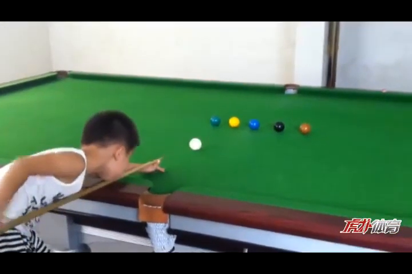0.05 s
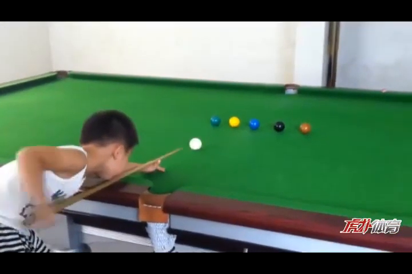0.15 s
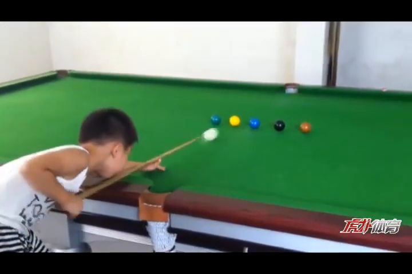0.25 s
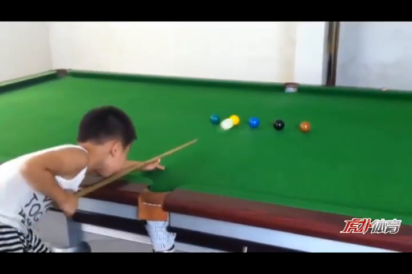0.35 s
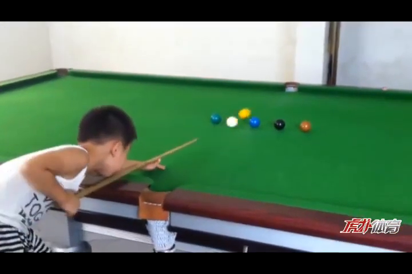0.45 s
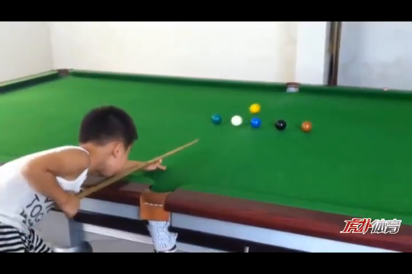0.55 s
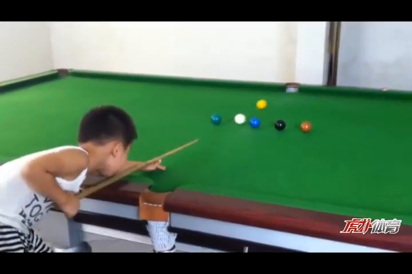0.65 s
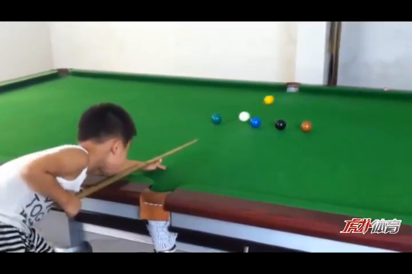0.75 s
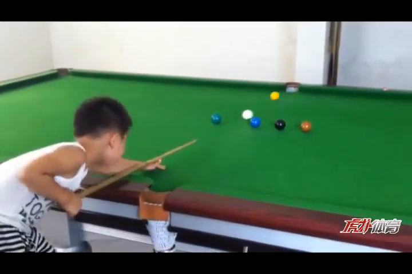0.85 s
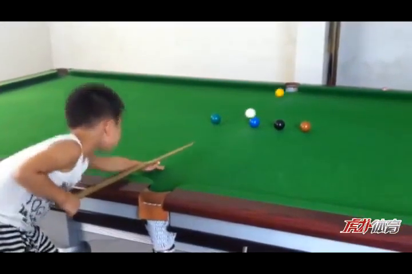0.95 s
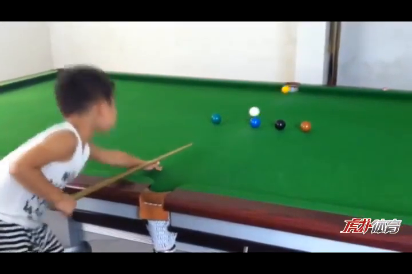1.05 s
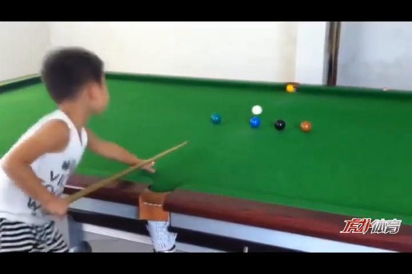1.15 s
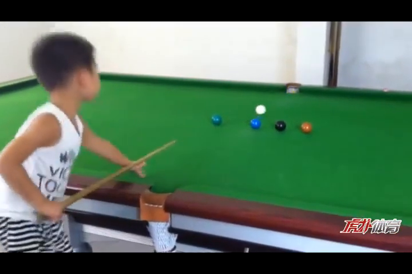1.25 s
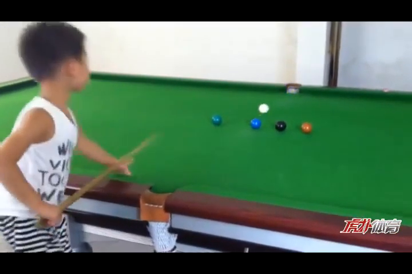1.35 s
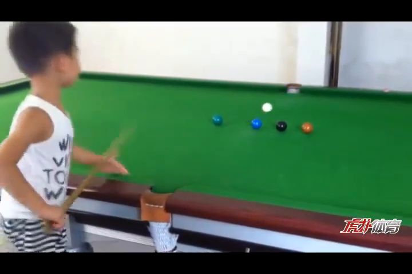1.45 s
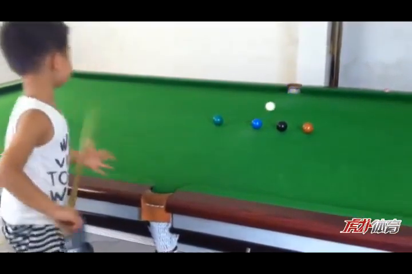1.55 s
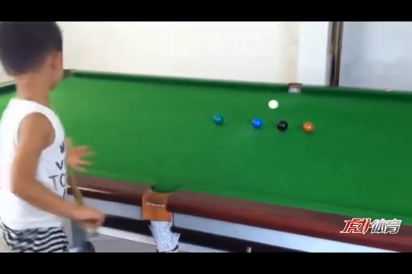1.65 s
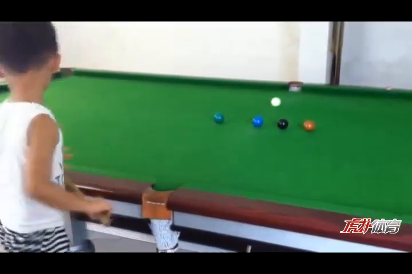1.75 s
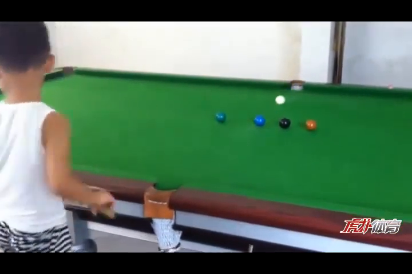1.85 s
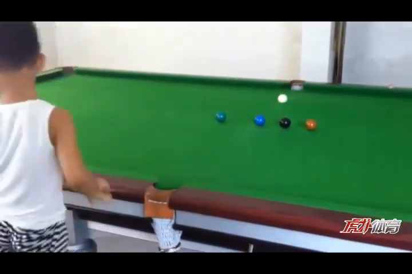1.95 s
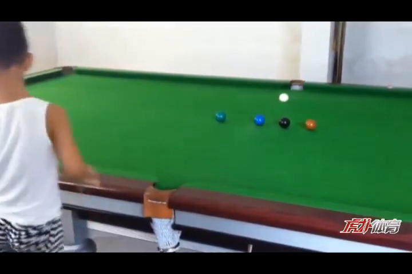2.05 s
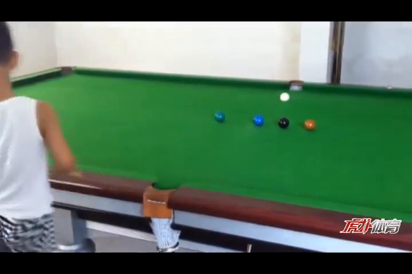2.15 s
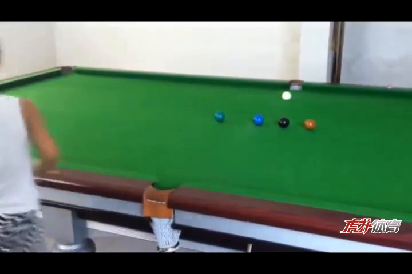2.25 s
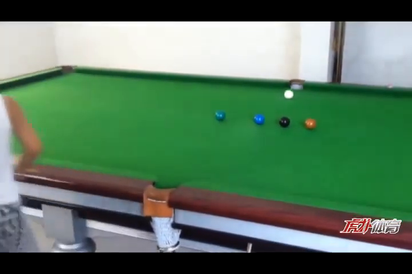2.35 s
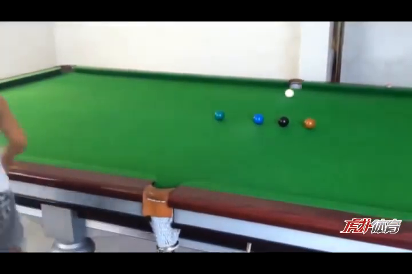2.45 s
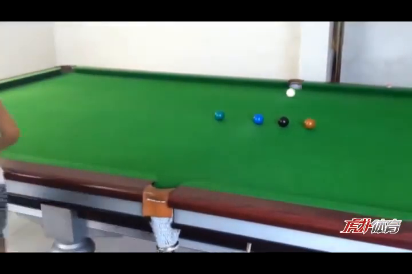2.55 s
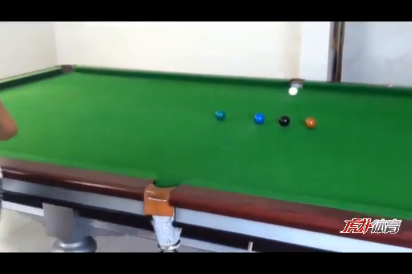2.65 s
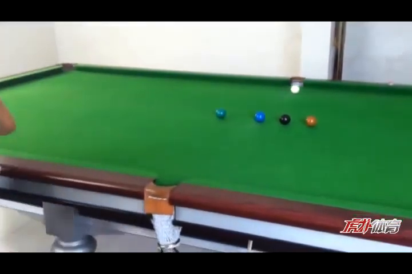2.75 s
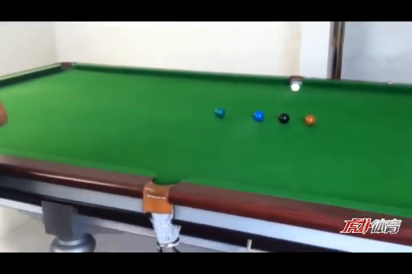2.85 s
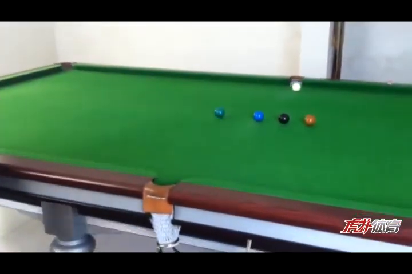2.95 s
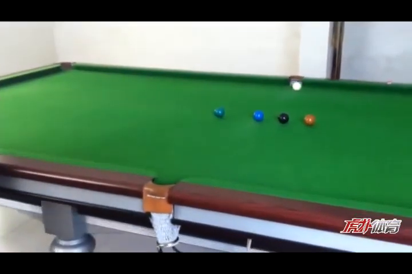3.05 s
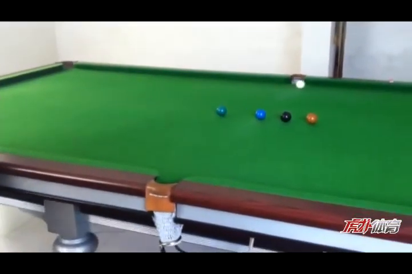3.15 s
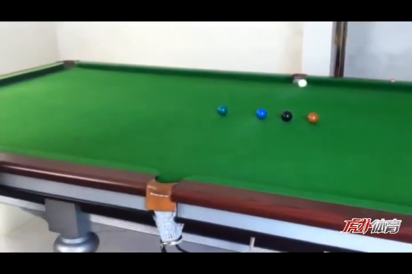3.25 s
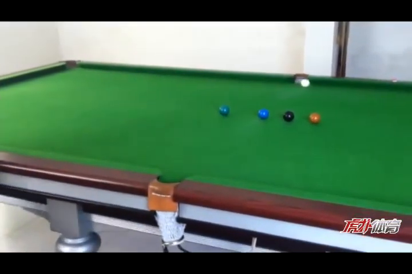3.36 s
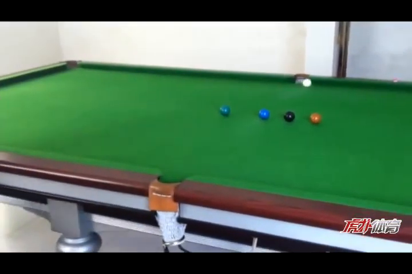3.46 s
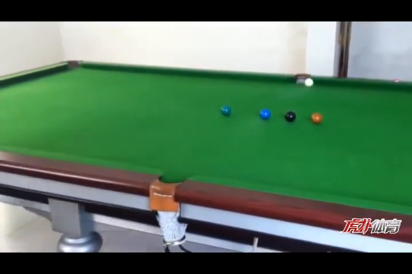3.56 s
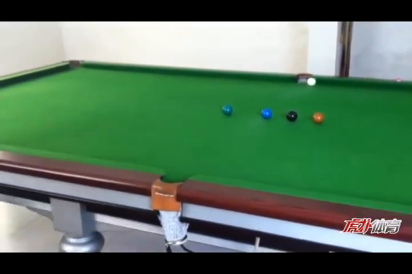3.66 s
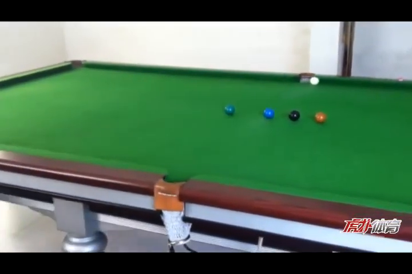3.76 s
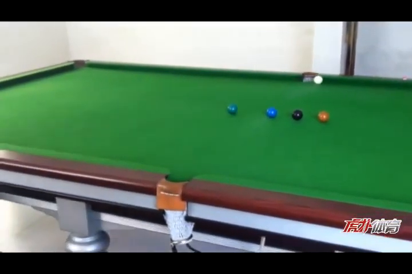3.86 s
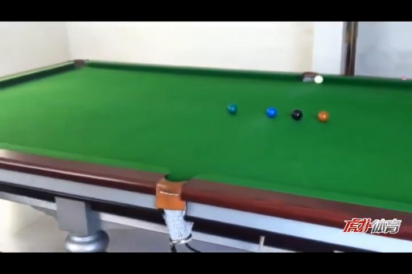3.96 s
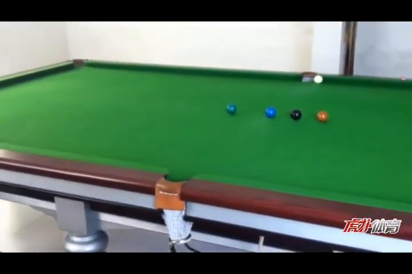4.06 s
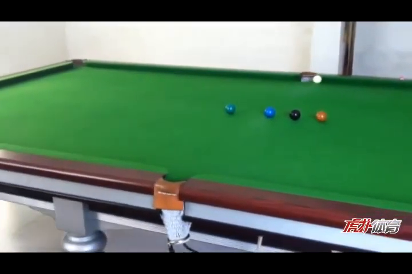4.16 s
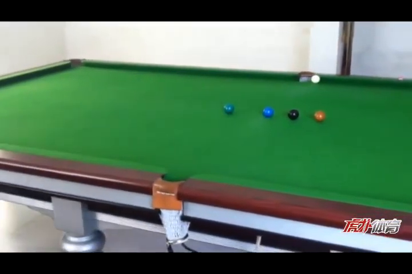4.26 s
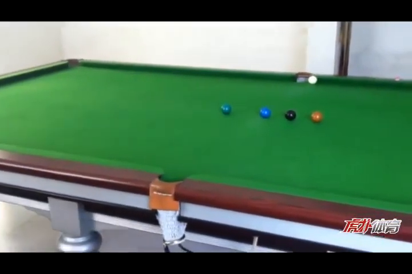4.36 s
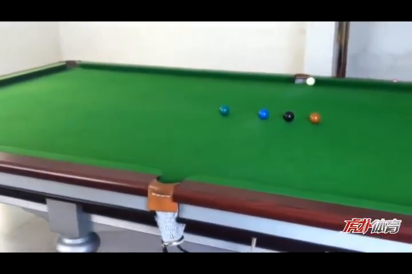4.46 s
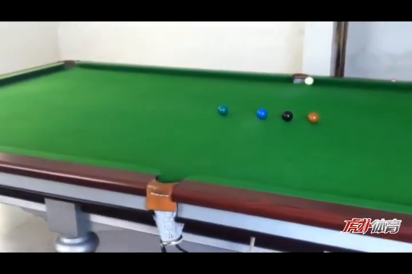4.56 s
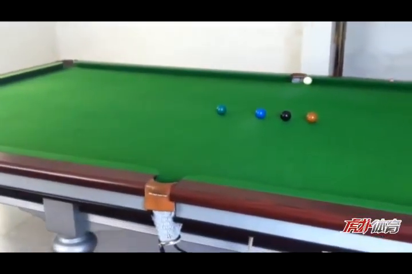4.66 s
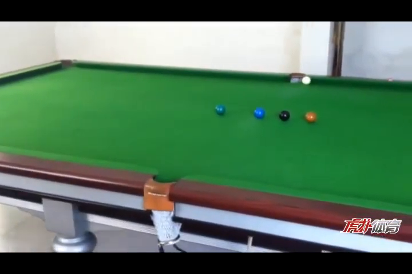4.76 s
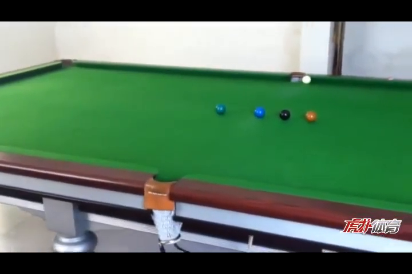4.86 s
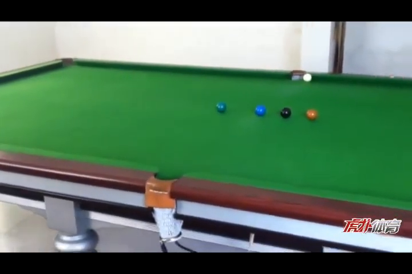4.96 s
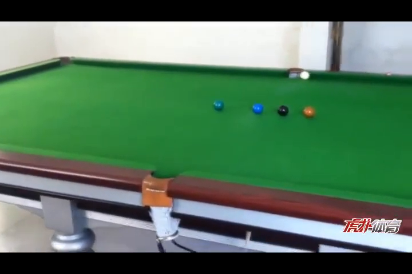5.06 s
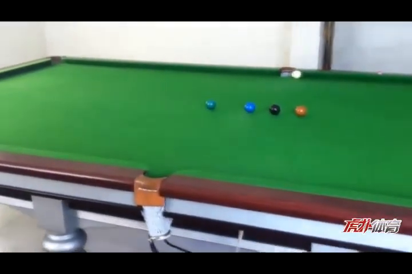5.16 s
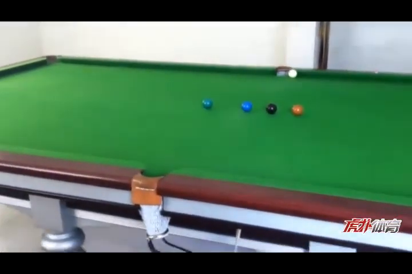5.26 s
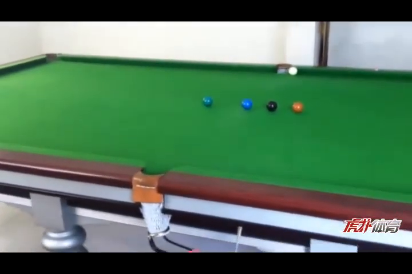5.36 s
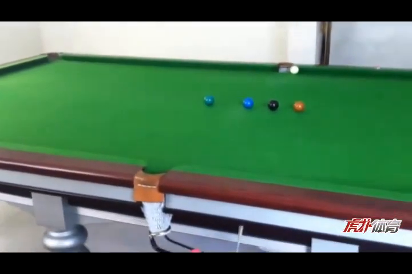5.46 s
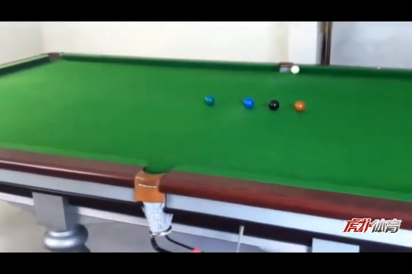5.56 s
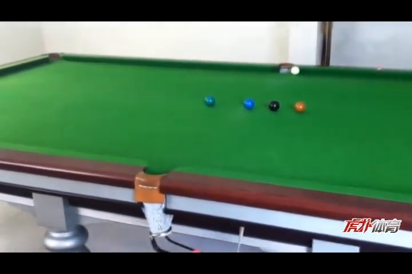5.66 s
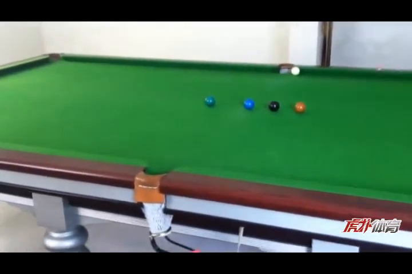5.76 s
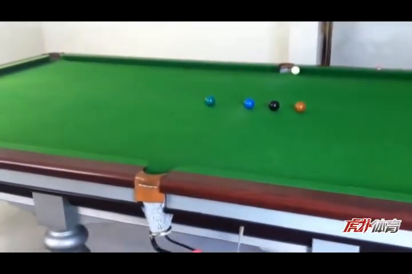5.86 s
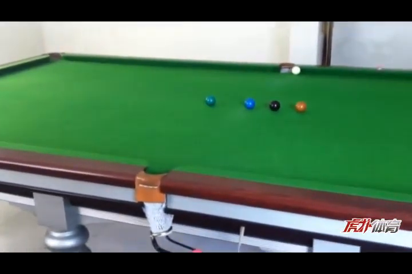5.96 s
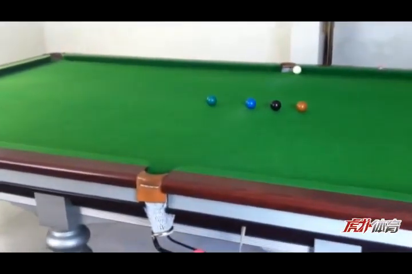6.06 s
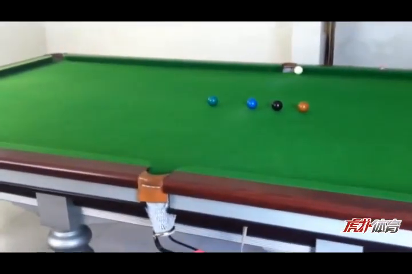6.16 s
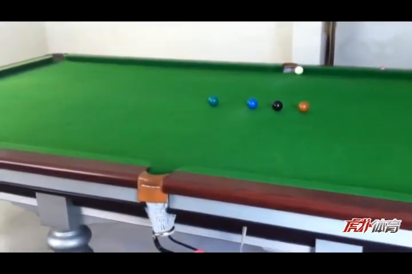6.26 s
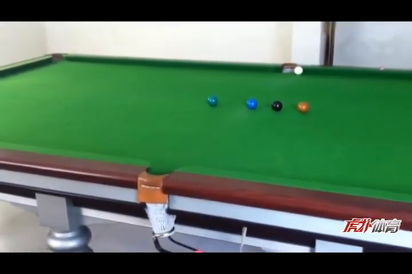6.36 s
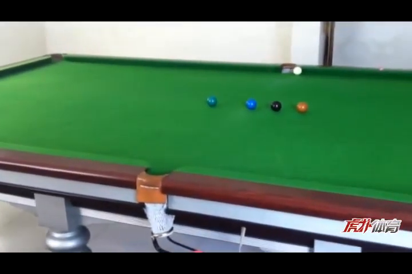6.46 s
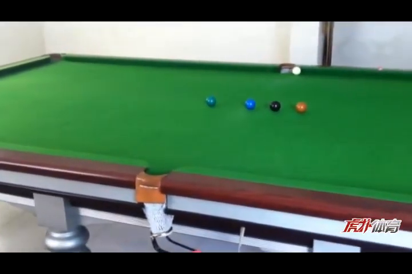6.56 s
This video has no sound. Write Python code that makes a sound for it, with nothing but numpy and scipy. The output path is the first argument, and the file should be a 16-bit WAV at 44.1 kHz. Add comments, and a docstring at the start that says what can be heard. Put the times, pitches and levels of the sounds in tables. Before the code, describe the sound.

A snooker shot is heard through a small microphone beside the table, in a bare, echoing hall with a low steady hum. At about 0.3 seconds the cue tip strikes a ball with a crisp crack and a short woody ring. At 0.5 seconds two balls meet in a sharp click, the loudest sound, which echoes for about a second. A soft pocket knock comes near 1.3 seconds, followed by light sandal scuffs. From 2.2 seconds sandals slap quietly as the player walks off. At 2.7 seconds the cue knocks against the rail, with a few smaller taps after it. Clattering wooden knocks with bright ticks come around 3.5 to 3.7 seconds, and again, with some hollower notes, from 4.3 to 4.6 seconds. From 5.3 seconds until about 6.5 only faint heel taps and scuffs sound over the hum.

```python
"""A snooker shot in a bare, echoing hall: the cue rings in its modes, then two balls click on the slate.
Pocket, rail and cue resonate in wooden knocks; faint heel taps follow as the player walks off.
Bursts of noise make the slaps and scuffs of sandals, and the bright ticks of the cue and other knocks.
The hall hums low and returns each blow as a diffuse field.
A small microphone with gain control listens from the table's side."""
import sys
import numpy as np
from scipy import signal
from scipy.fft import rfft, irfft, next_fast_len
from scipy.io import wavfile
from scipy.ndimage import uniform_filter1d

SR = 44100
rng = np.random.default_rng(int(sys.argv[2]) if len(sys.argv) > 2 else 0)


def digitize_waveform(pressure):
    """Quantize a signal to 16-bit integers and store it at the path in sys.argv[1].

    Rows of a 2-D input are taken as channels; values are limited to [-1, 1].
    """
    field = np.atleast_2d(pressure).T
    bounded = np.clip(field, -1, 1)
    quanta = np.round(bounded * 32767).astype(np.int16)
    wavfile.write(sys.argv[1], SR, quanta)


N = 291491


def amp(db):
    """Decibels as an amplitude ratio."""
    return 10 ** (np.asarray(db) / 20)


def unit(x):
    """Normalisation to an rms of 1."""
    return x / np.sqrt(np.mean(x ** 2) + 1e-20)


def along(points, hz):
    """Interpolation of (frequency, value) points on a logarithmic frequency axis."""
    frequencies, values = np.transpose(points)
    return np.interp(np.log(hz + 1), np.log(frequencies + 1), values)


def filtered(x, response):
    """Zero-phase filtering: the spectrum is multiplied by a gain that depends on frequency."""
    size = next_fast_len(x.shape[-1] + 8192)
    return irfft(rfft(x, size) * response(np.fft.rfftfreq(size, 1 / SR)), size)[..., :x.shape[-1]]


def add(out, start_s, sound, hall_db, paths=(1,)):
    """Superposition: row 0 takes the sound along its near paths, row 1 the share sent into the hall."""
    near = np.convolve(sound, paths)
    part = out[:, round(start_s * SR):][:, :len(near)]
    part[0] += near[:part.shape[1]]
    part[1, :len(sound)] += amp(hall_db) * sound[:part.shape[1]]


def hall_hum(level_db=-48):
    """Coloured noise: the hall's low steady rush, slightly patchy in time and frequency."""
    # spectral density of the hum: frequency_hz, level_db
    spectrum = [(20, 2.5), (45, -7), (100, -18), (128, 0), (190, -6), (225, -4), (270, 0), (320, -10.5),
                (375, -4), (700, -16.5), (1400, -19.5), (2200, -24), (4500, -36), (13800, -43.5),
                (14500, -88)]
    bands = signal.stft(rng.standard_normal(N), nperseg=1024)[2]
    patches = uniform_filter1d(rng.standard_normal(bands.shape), size=6, axis=0)
    patches = uniform_filter1d(patches, size=3, axis=1)
    noise = signal.istft(bands * amp(.6 * unit(patches)), nperseg=1024)[1][:N]
    return amp(level_db) * unit(filtered(noise, lambda hz: amp(along(spectrum, hz))))


def ringing(modes, rise_s, scatter_db):
    """Free vibration: a sum of damped modes, scattered in strength and wavering in phase; peak 1."""
    t = np.arange(SR // 4) / SR
    ring = np.zeros(len(t))
    for pitch_hz, level_db, t60_s in modes:
        decay = amp(level_db + scatter_db * rng.normal() - 60 * t / t60_s)
        drift = np.cumsum(rng.standard_normal(len(t))) * pitch_hz / 120000
        ring += decay * np.sin(2 * np.pi * pitch_hz * t + drift)
    ring *= 1 - np.exp(-t / rise_s)
    return ring / np.abs(ring).max()


def crack(colour_db, rise_s, t60_s):
    """Modal overlap: the many weak modes of a blow merge into a noise burst of smooth colour; peak 1."""
    t = np.arange(SR // 4) / SR
    bins_hz = np.fft.rfftfreq(len(t), 1 / SR)
    burst = rng.standard_normal(len(t)) * amp(-60 * t / t60_s)
    lumps = np.sqrt(uniform_filter1d(np.abs(rfft(burst)) ** 2, size=25))
    burst = filtered(burst, lambda hz: amp(colour_db(hz)) / np.interp(hz, bins_hz, lumps))
    burst *= 1 - np.exp(-t / rise_s)
    return burst / np.abs(burst).max()


def cue_strokes():
    """Impulse excitation: the leather tip cracks and the stick rings on in its natural modes."""
    # modes of the stick: pitch_hz, level_db, t60_s
    stick_modes = [(249, -20, 0.067), (430, -16.5, 0.028), (738, -23, 0.36), (892, -15, 0.049),
                   (1107, -10.5, 0.14), (1458, -2.5, 0.046), (1978, -1, 0.058), (2525, -10.5, 0.069),
                   (2730, -18, 0.057), (3085, -15, 0.059), (3650, -14.5, 0.042)]
    # spectral density of the tip's crack: frequency_hz, level_db
    tip_spectrum = [(300, -7.5), (900, 1), (2000, -4.5), (4000, -19.5), (6200, -14.5), (7000, -31),
                    (12000, -35), (15000, -66)]
    # blows on the ball, then the rail: start_s, level_db, rise_s, tilt_db_per_octave, crack_db, hall_db
    strokes = [(0.3441, -8, 0.0013, 1, -5, -0.5), (2.7165, -29, 0.0024, -5, -18, -2)]
    out = np.zeros((2, N))
    for start_s, level_db, rise_s, tilt, crack_db, hall_db in strokes:
        modes = [(hz, db + tilt * max(np.log2(hz / 1500), 0), t60) for hz, db, t60 in stick_modes]
        tip = amp(crack_db) * crack(lambda hz: along(tip_spectrum, hz), rise_s=0.0012, t60_s=0.03)
        stick = ringing(modes, rise_s, scatter_db=1.5)
        add(out, start_s, amp(level_db) * (stick + tip), hall_db)
    return out


def impulse(spectrum):
    """Minimum phase: the most compact causal pulse that has the given spectrum; peak 1."""
    cepstrum = irfft(np.log(amp(along(spectrum, np.fft.rfftfreq(2048, 1 / SR)))))
    cepstrum[1:1024] *= 2  # fold onto positive time
    cepstrum[1025:] = 0
    pulse = irfft(np.exp(rfft(cepstrum)))
    return pulse / np.abs(pulse).max()


def ball_click():
    """Elastic collision: a brief contact radiates a pulse with early echoes, and the slate rings."""
    # ball on ball: start_s, level_db, hall_db
    collisions = [(0.53, -2, 3.5)]
    # spectral density of the click: frequency_hz, level_db
    spectrum = [(300, -21), (800, -36), (1350, -4), (2200, 2), (3300, -4), (5000, -28), (6000, -54),
                (10500, -36), (14000, -57)]
    # reflections off slate, cushions and walls: delay_s, gain_db
    echoes = [(.00045, -2), (.0021, -7), (.0025, -6), (.0033, -14), (.0055, -16), (.007, -15), (.0145, -14),
              (.02, -14), (.028, -12)]
    # modes of the table bed under the balls: pitch_hz, level_db, t60_s
    slate_modes = [(920, 3, 0.033), (1080, 4, 0.029), (1380, 10.5, 0.042)]
    delays = [0] + [round(delay_s * SR) for delay_s, _ in echoes]
    gains = [1] + [amp(gain_db) for _, gain_db in echoes]
    out = np.zeros((2, N))
    for start_s, level_db, hall_db in collisions:
        add(out, start_s, amp(level_db) * impulse(spectrum), hall_db, paths=np.bincount(delays, gains))
        slate = ringing(slate_modes, rise_s=0.0005, scatter_db=0)
        add(out, start_s, amp(level_db - 14) * slate, hall_db=-4)
    return out


def knocks_and_heel_taps():
    """Contact hardness limits the modes a blow excites; the struck spot adds its own note and a crack."""
    # modes of rail and cue butt, which also colour the heel taps: pitch_hz, level_db, t60_s
    body_modes = [(167.5, -8.5, 0.1), (273.7, -6, 0.14), (342, 0, 0.039), (426.6, -13, 0.15),
                  (670, 2.5, 0.039), (877, -1.5, 0.055), (1125, -10.5, 0.13), (1323, -11.5, 0.18),
                  (1445, 5, 0.017), (1950, 3.5, 0.03), (3130, 2, 0.035)]
    # wooden knocks of pocket, rail and cue, then faint heel taps:
    # start_s, level_db, cutoff_hz, tilt_db_per_octave, rise_s, note_hz, note_db, crack_db, hall_db
    blows = [(1.342, -34, 2170, -4.5, 0.00034, 740, 13, 1.2, 4.5),
             (1.386, -46, 1090, -5, 0.0091, 803, -9, -7, 7), (2.394, -44, 2300, 2, 0.007, 1850, 9, -1, -1),
             (2.407, -37.5, 278, 1, 0.0019, 177, 2, 5.5, 0.5),
             (2.509, -40.5, 604, 1, 0.0074, 280, -4, -4.5, 11),
             (2.581, -35.5, 1400, -5, 0.011, 810, -11, 0.5, -1),
             (2.718, -17.5, 1500, 5, 0.0025, 1533, 12.5, -3, -7),
             (2.726, -29, 1290, -1.5, 0.01, 243.4, -5, -1.5, 8.5),
             (2.745, -33, 1300, 0, .006, 1200, 10, -0.5, 5.5),
             (2.926, -30.5, 1650, -1.5, .006, 1370, 3, 3, 2),
             (3.486, -26, 3400, -4.5, 0.00126, 300, -20, 0.5, 3),
             (3.509, -28.5, 910, -2, 0.0048, 283, -16, 1, 1),
             (3.692, -32.5, 3430, 2.5, 0.001, 3330, 6, 5, 5.5),
             (3.696, -23, 2700, 3, 0.0014, 2316, 9.5, 0, 4),
             (3.704, -17, 1350, 0.5, 0.0024, 626, -6.5, -6.5, 2),
             (3.715, -22.5, 500, 0, 0.003, 290, -7, -12, 0.5),
             (4.291, -23, 1300, 3, 0.0026, 304, 9.5, -9.5, 3.5),
             (4.305, -24, 448, -3, .003, 288, 1, -1, -6),
             (4.338, -32.5, 800, 19, 0.013, 425, 12, -6.5, 1.5),
             (4.345, -35.5, 900, 7, 0.015, 702, 13, -13, 4),
             (4.407, -24.5, 465, 21, 0.0027, 340, 7, -19, -1.5),
             (4.512, -24, 4040, 4, 0.00033, 2930, 8, 1, -1), (4.523, -26.5, 577, 2, .008, 335, -3, -3.5, 4),
             (4.524, -26, 2400, 6.5, 0.0049, 1720, -2, 7, 3),
             (4.536, -27, 4200, 16, 0.0014, 3710, 6, -5.5, 1.5),
             (4.553, -29.5, 500, 6, 0.0047, 340, 7, 1.5, -5.5),
             (4.612, -29, 2300, 10, 0.0013, 2073, 14, -3, -1), (5.345, -42, 4730, 5, 0.0004, 2930, 5, 0, 3),
             (5.353, -47, 3200, 7, .0006, 2030, 1, 2.5, -0.5),
             (5.7815, -42.5, 3000, 13, 0.00056, 1760, 9, -1.5, 4.5),
             (6.043, -39.5, 320, 2, 0.013, 272, -3, -17, -5),
             (6.155, -44.5, 3600, 5, 0.0005, 1900, -4, 0, 5.5),
             (6.173, -45.5, 5900, 0, .0004, 4570, 11, -2, 3),
             (6.524, -38.5, 315, 8, 0.033, 246, -1, -13, 1.5)]
    lowest_hz = 205  # small bodies radiate little below
    spot_shift = .04  # each blow lands elsewhere and shifts the modes by about this share
    note_cycles, note_hold_s = 25, .012
    out = np.zeros((2, N))
    for start_s, level_db, cutoff_hz, tilt, rise_s, note_hz, note_db, crack_db, hall_db in blows:
        def excitation_db(hz):
            """A tilted band-pass with a floor."""
            loss = (1 + (hz / cutoff_hz) ** 10) * (1 + (lowest_hz / (hz + 20)) ** 5)
            return np.maximum(-10 * np.log10(loss) + tilt * np.log2((hz + 20) / cutoff_hz), -56)

        modes = [(hz * (1 + spot_shift * rng.normal()), db + excitation_db(hz), t60)
                 for hz, db, t60 in body_modes]
        modes.append((note_hz, note_db, note_cycles / note_hz + note_hold_s))
        ring = ringing(modes, rise_s, scatter_db=2)
        contact = amp(crack_db) * crack(excitation_db, rise_s, t60_s=0.052)
        add(out, start_s, amp(level_db) * (ring + contact), hall_db)
    return out


def steps_and_ticks():
    """Impact and friction noise: sudden in a sandal's slap or a knock's tick, swelling in a scuff."""
    # sandal slaps and scuffs, plus bright ticks of the knocked cue and other knocks:
    # start_s, level_db, rise_s, tilt_db_per_octave, hall_db
    bursts = [(1.453, -53, 0.021, 0, 10.5), (1.486, -42.5, 0.027, 8, 2), (1.558, -42.5, 0.012, -3.5, 6.5),
              (2.232, -50, 0.00066, -6.5, 2), (2.241, -38, 0.002, -6, -2), (2.342, -56, 0.0071, 2, -0.5),
              (2.465, -47.5, 0.0033, -3, -9), (2.484, -47, 0.0018, -3.5, 6.5),
              (2.55, -51.5, 0.0076, -3, -7), (2.719, -35, 0.0019, -5.5, 1.5), (2.807, -43, 0.014, -2, -1),
              (2.836, -33.5, 0.0019, -3.5, 1), (2.899, -38, 0.0062, -5, -5), (3.256, -42, 0.002, -4, 1.5),
              (3.504, -34.5, 0.0024, 1.5, -1), (3.608, -35, 0.0037, 0.5, 0.5),
              (3.664, -36, 0.00067, 0, 8.5), (3.688, -33, 0.0043, 2, -1.5), (4.49, -29.5, 0.0022, -3, 8.5),
              (4.52, -30, 0.005, 7, -3.5), (4.949, -55, 0.0076, 1, 5.5), (5.361, -52, 0.0033, -3.5, 2),
              (5.525, -61.5, 0.0048, 2, 2), (5.657, -65, 0.022, 0, 5), (5.791, -47, 0.0022, -5, 7),
              (5.9, -68.5, .04, 5, 2), (6.128, -56, 0.0077, -3, 9), (6.17, -53.5, 0.00075, 0.5, 5),
              (6.48, -60, 0.0078, -0.5, 5), (6.546, -55.5, 0.0064, 7, 4)]
    # spectral density of the contact noise: frequency_hz, level_db
    spectrum = [(100, -7), (400, -8.5), (1500, 1), (3000, 0.5), (6500, -3.5), (10500, -4), (14000, -6.5),
                (16000, -26)]
    shortest_t60_s, drag = 0.056, 11.8  # the decay lengthens by drag times the rise
    t = np.arange(SR // 3) / SR
    out = np.zeros((2, N))
    for start_s, level_db, rise_s, tilt, hall_db in bursts:
        grit = rng.standard_normal(len(t)) * amp(2 * rng.standard_normal(len(t)))
        grit = filtered(grit, lambda hz: amp(along(spectrum, hz) + tilt * np.log2((hz + 50) / 4000)))
        swell = np.clip(t / rise_s, 0, 1) ** 2
        decay = amp(-60 * np.maximum(t - rise_s, 0) / (shortest_t60_s + drag * rise_s))
        add(out, start_s, amp(level_db) * swell * decay * unit(grit), hall_db)
    return out


def reverberation(sent):
    """Diffuse field: each band's energy fills the hall, then decays at its own rate, with random phase."""
    # reverberation times of the hall: frequency_hz, t60_s
    decay_times = [(150, 2.53), (500, 1.59), (1500, 1.156), (3500, 0.96), (7000, 0.88), (14000, 0.58)]
    delay_samples, fill_s = 620, 0.00084
    scattered = .3  # share of the energy that walls and furniture blur over neighbouring bands
    frames = dict(fs=SR, nperseg=1024, noverlap=896)
    hz, t, bands = signal.stft(np.pad(sent, (delay_samples, 0))[:N], **frames)
    hop_s = t[1] - t[0]
    fill = np.exp(-hop_s / fill_s)
    retained = amp(-60 * hop_s / along(decay_times, hz)) ** 2
    power = np.abs(bands) ** 2
    power = (1 - scattered) * power + scattered * uniform_filter1d(power, size=9, axis=0)
    energy = [signal.lfilter([(1 - keep) * (1 - fill)], np.convolve([1, -keep], [1, -fill]), band)
              for keep, band in zip(retained, power)]
    noise = signal.stft(rng.standard_normal(N), **frames)[2]
    noise /= 2 * np.abs(noise).std()
    return signal.istft(noise * np.sqrt(np.abs(energy)), **frames)[1][:N]


def scene():
    """Superposition of near sound, reverberant field and hum in one channel."""
    near, sent = cue_strokes() + ball_click() + knocks_and_heel_taps() + steps_and_ticks()
    return (near + reverberation(sent) + hall_hum())[None]


def record(dry):
    """Compression: gain falls as the rms rises. Deep bass and the highest treble are filtered away."""
    averaging_s, knee_db = .35, -16.5
    bass_hz, bass_floor_db, top_hz = 118, -29.5, 15700
    keep = np.exp(-1 / (averaging_s * SR))
    running_rms = np.sqrt(np.abs(signal.lfilter([1 - keep], [1, -keep], dry ** 2)))
    ducked = dry / (1 + running_rms / amp(knee_db))
    bass_cut = lambda hz: amp(bass_floor_db) + 1 / (1 + (bass_hz / (hz + 1)) ** 7)
    return filtered(ducked, lambda hz: bass_cut(hz) * (hz < top_hz))


dry = scene()
out = record(dry)
digitize_waveform(out)
```